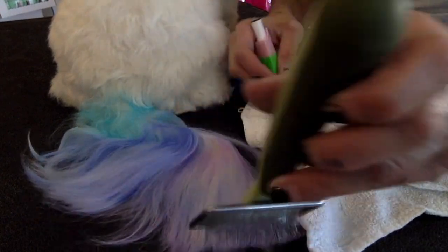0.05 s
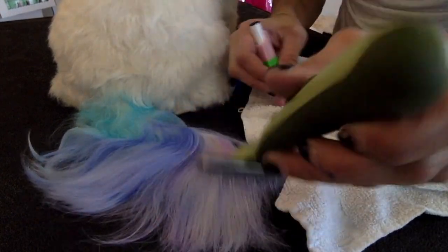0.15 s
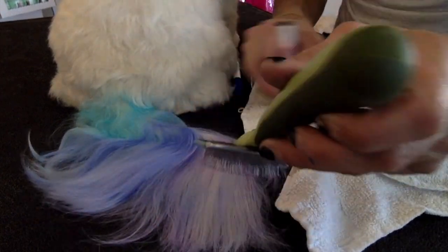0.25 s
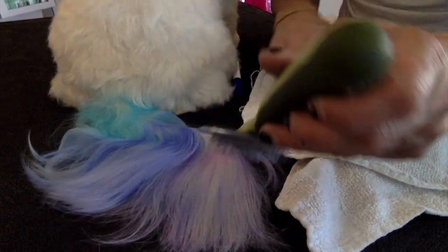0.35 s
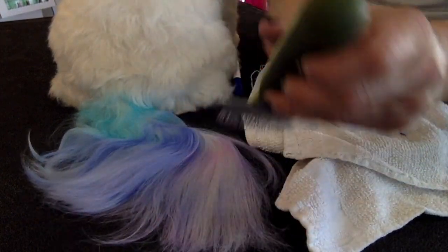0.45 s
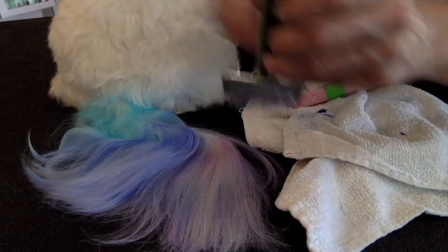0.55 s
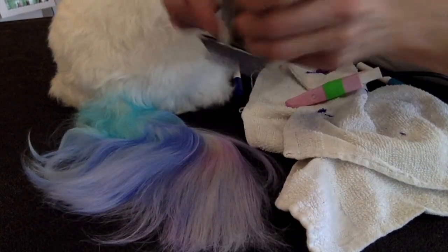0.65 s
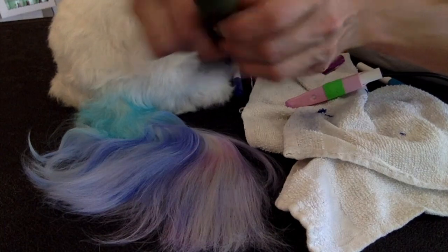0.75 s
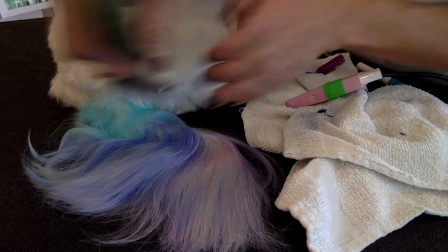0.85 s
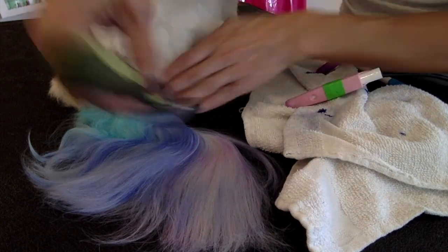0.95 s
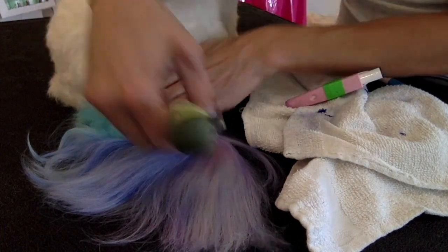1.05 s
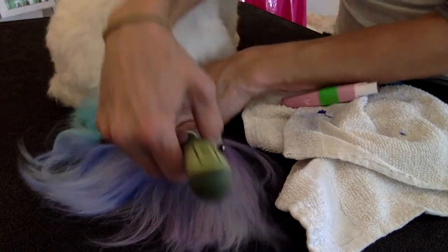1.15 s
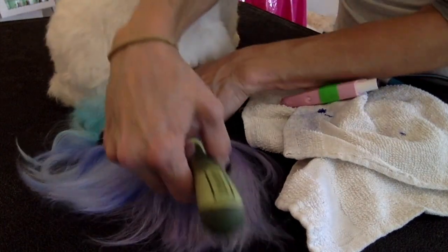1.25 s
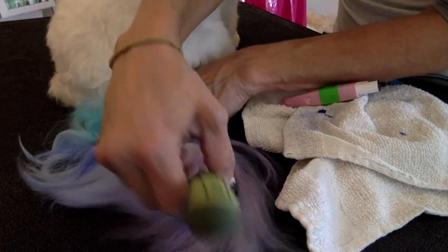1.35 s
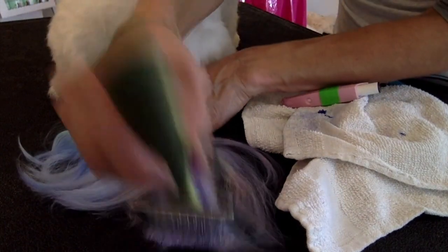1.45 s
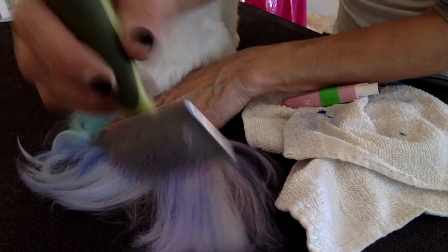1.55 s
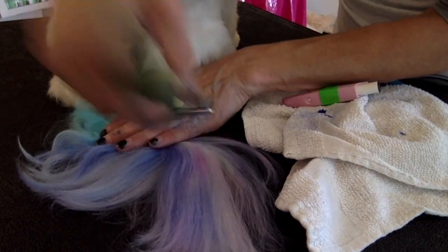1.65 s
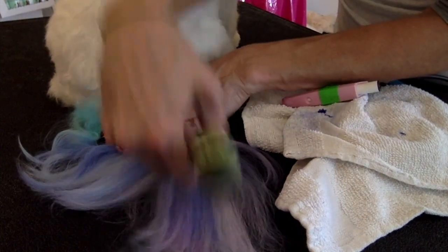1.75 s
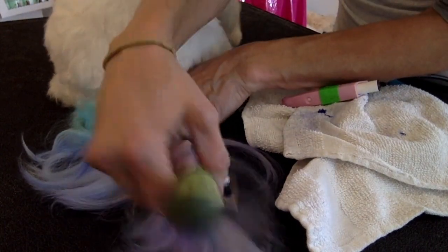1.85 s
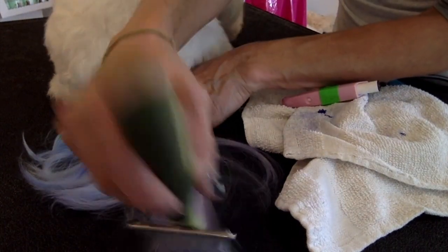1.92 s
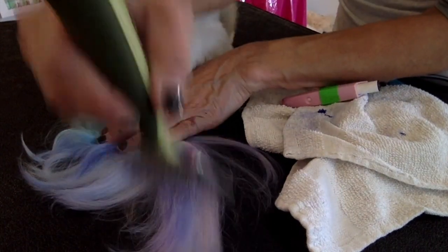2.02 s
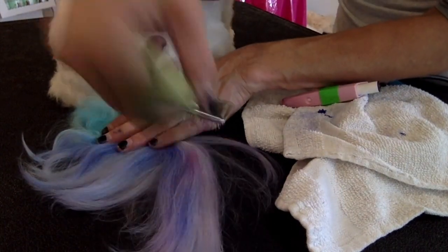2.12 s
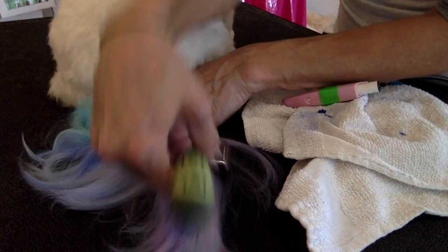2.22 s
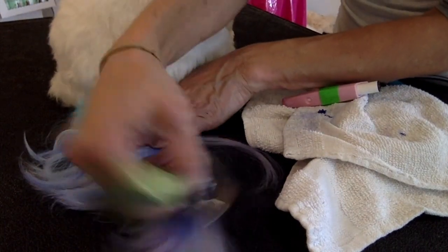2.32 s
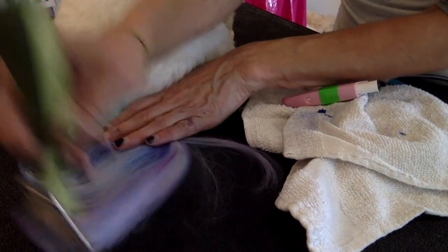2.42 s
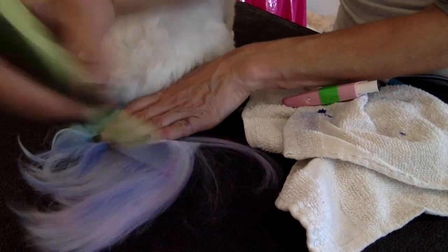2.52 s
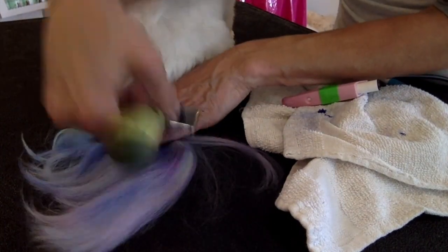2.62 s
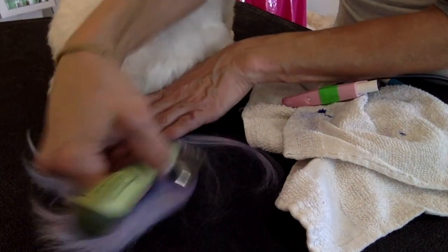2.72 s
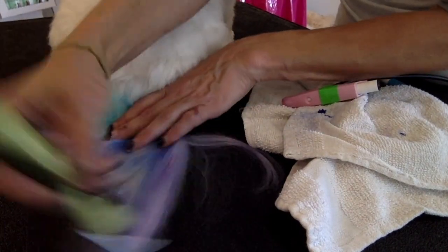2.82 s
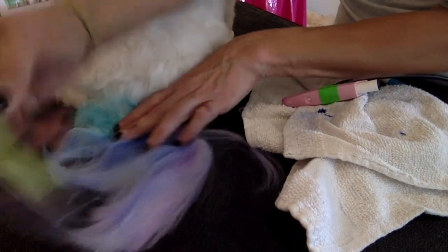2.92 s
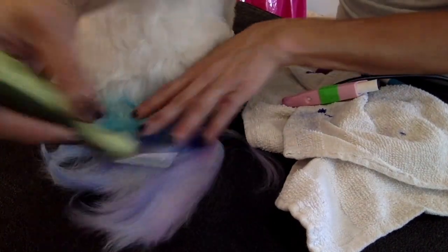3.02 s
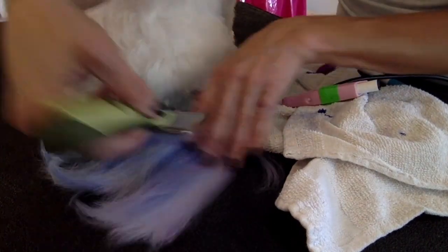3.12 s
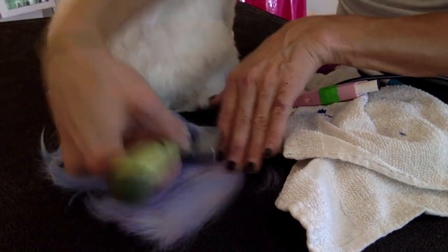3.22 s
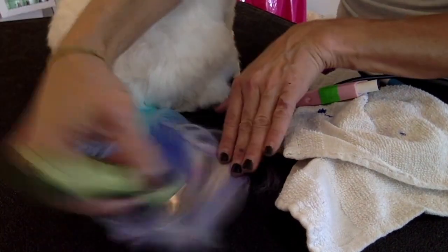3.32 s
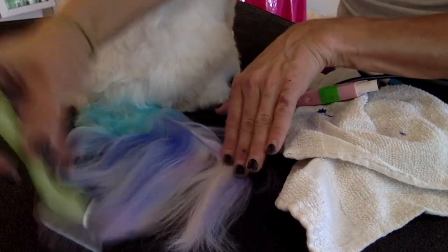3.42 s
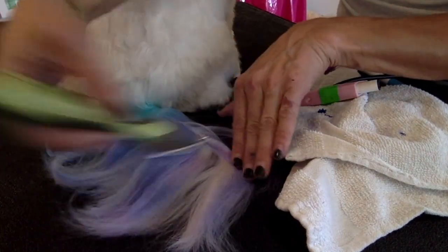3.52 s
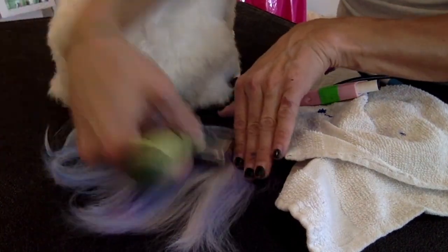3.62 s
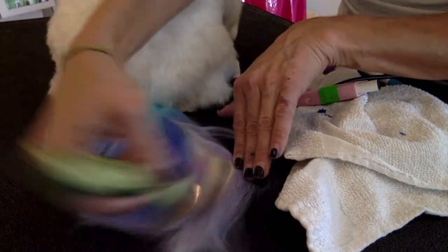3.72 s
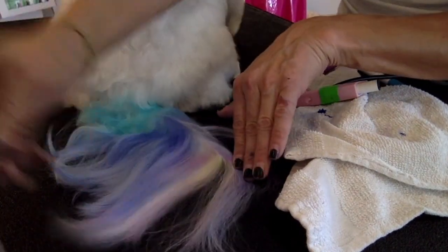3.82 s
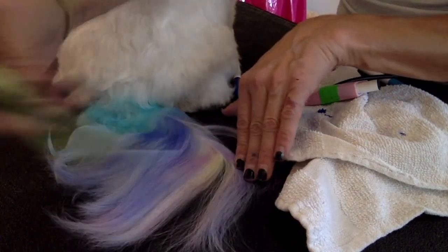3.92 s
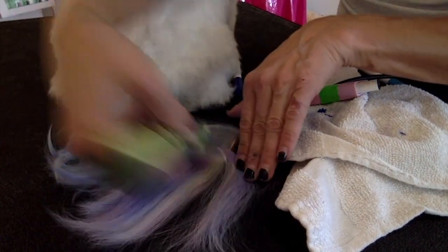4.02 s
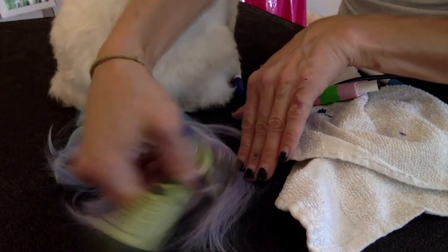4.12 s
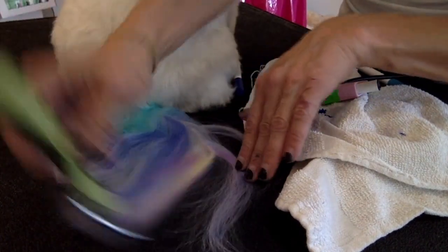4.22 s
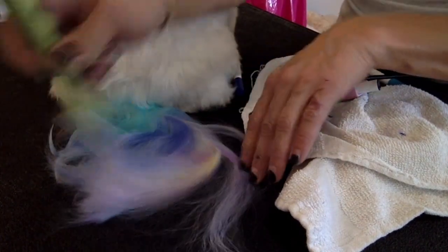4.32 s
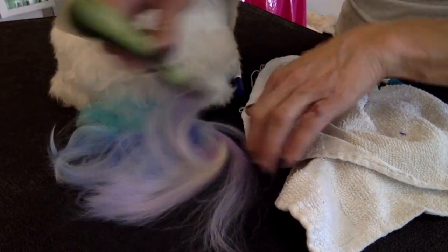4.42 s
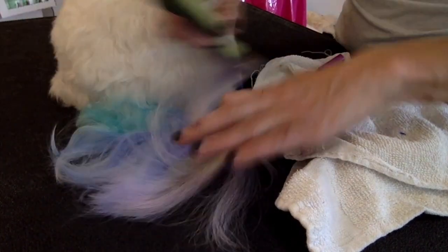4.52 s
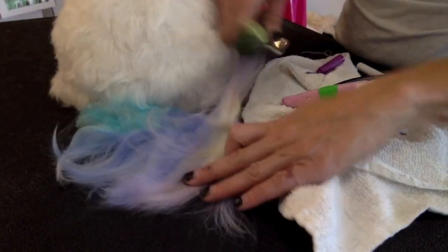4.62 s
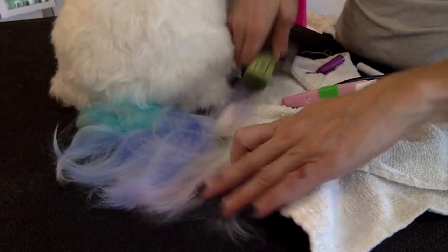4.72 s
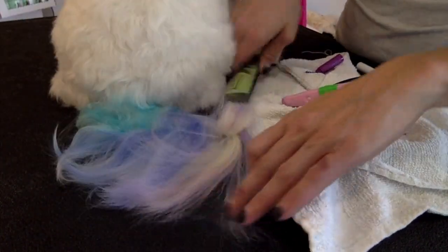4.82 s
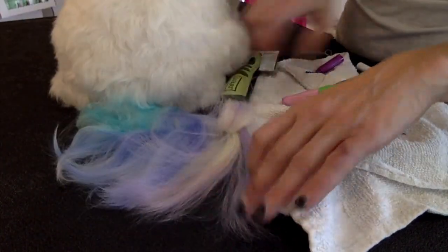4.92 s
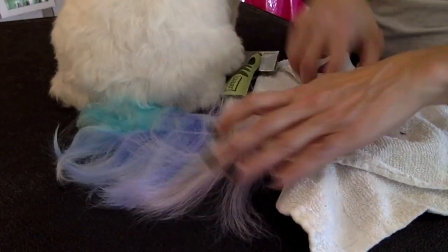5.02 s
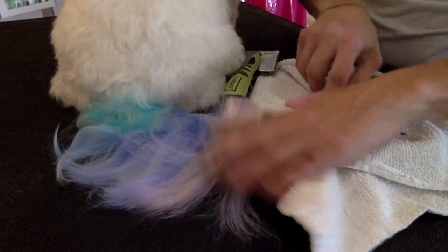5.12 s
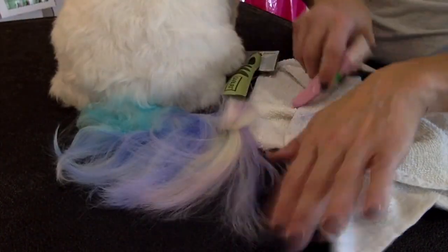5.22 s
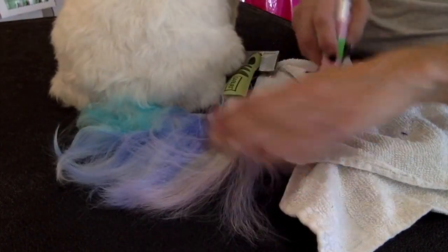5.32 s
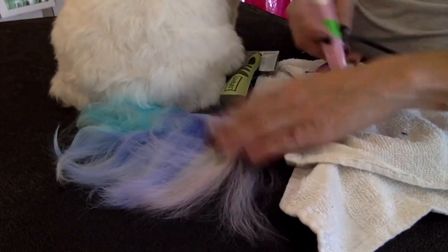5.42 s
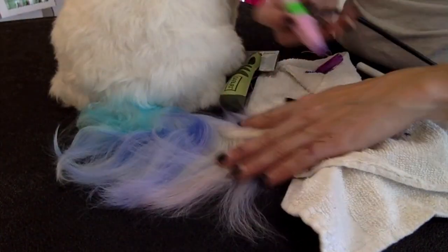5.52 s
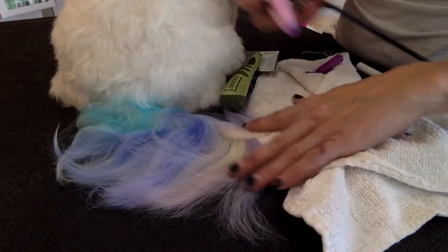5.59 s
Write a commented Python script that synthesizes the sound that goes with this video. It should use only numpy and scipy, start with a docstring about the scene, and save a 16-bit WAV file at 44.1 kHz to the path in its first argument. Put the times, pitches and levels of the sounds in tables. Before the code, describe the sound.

A low, airy equipment hum runs alone for just over a second in a small room. Then a wire-pinned brush makes seven short, bright hissing strokes through silky hair, close to the microphone, roughly half a second apart. Some begin with a tiny tick, and later ones sound firmer. Faint grainy cloth rustles follow as the hum goes on.

```python
"""A low hum of grooming equipment fills a small room, then a wire slicker brush is pulled close by.
It goes seven times through silky dog hair: filtered noise and tiny clicks swell into a hiss and fall away.
Some strokes start with a tick as the pins touch down; after the strokes, grainy noise rustles like a towel.
The hum is shaped noise plus unsteady tones, and faint wall echoes blur the close sounds.
A noise suppressor lets the hum up with each stroke and slowly sinks it in the pauses."""
import sys
import numpy as np
from scipy import signal
from scipy.fft import rfft, irfft, next_fast_len
from scipy.io import wavfile
from scipy.ndimage import uniform_filter1d, map_coordinates

SR = 44100
rng = np.random.default_rng(int(sys.argv[2]) if len(sys.argv) > 2 else 0)


def wrap_up_sound(samples):
    """Save the sound to the file named by the first command line argument, as 16-bit audio."""
    columns = np.atleast_2d(samples).T
    # keep every value between -1 and 1, then stretch to whole-number steps
    tamed = np.clip(columns, -1, 1)
    steps = np.round(tamed * 32767).astype(np.int16)
    wavfile.write(sys.argv[1], SR, steps)


N = 249341
TOP_HZ = 15750  # upper limit of the sound

# Brush strokes. Columns: bite_s, rise_s (bite to full pull), hold_s, level_db (at full pull),
# swell_db (rise from the bite), shape (1 even, 2 early), fall_db_per_s (after release), grip (0 to 1)
BRUSH_STROKES = [ (1.308, 0.12, .040, -25.5, 10, 1.2, 1499, .05),
                 (1.864, .076, .025, -22, 9.5, 2, 1046, .45), (2.326, 0.09, 0.019, -22, 8, 2, 1298.5, .6),
                 (2.779, 0.069, .028, -21.5, 11, 1, 2900.5, .7),
                 (3.338, 0.054, 0.029, -24, 3.5, 2, 1099, .9), (3.734, 0.081, .014, -21, 8, 1, 448, .95),
                 (4.175, 0.083, .010, -21, 16.5, 1.03, 1601.5, 0.9)]
EDGE_HZ, EDGE_GRIP_HZ = 1880, -950  # lower edge of the hiss with the pins sunk in, and its shift at full grip
HEAD_DB, HEAD_GRIP_DB = -31, 12  # brush head relative to the hiss at no grip, and its gain at full grip
RING_DB, RING_GRIP_DB = -19.5, 13  # the same for the ring of the pins
BRIGHT_DB = 4.5  # lift of the hiss's highest part against the rest
RECOVER_S = 0.091  # time the pins take to relax
BITE_DB, BITE_S = 4, 0.002  # extra jump in level as the pins catch, and its duration
ATTACK_DB_PER_S = 1900.5  # pins brushing in before the bite
EASE_DB_PER_S = 54  # the pull slackens while it is held


def brush(light_edge_hz=3500, last_edge_hz=1450, ring_hz=4420, head_delay_db=14, split_hz=6500,
          snag_db=0.4, sink_share=0.85, touch_ring_db=-8):
    """Hairs slip off the pins; a deeper, firmer grip lowers the hiss's edge and brings in head and ring."""
    t = clock()
    hiss, ring, head = np.zeros((3, N))
    edge = []
    for bite, rise, hold, db, swell_db, shape, fall, grip in BRUSH_STROKES:
        full = bite + rise
        release = full + hold
        slack = np.clip((full - t) / rise, 0, 1)  # 1 at the bite, 0 at full pull
        early = np.maximum(bite - t, 0)
        late = np.maximum(t - release, 0)
        bite_drop_db = BITE_DB * np.minimum(early / BITE_S, 1)
        entering_db = bite_drop_db + ATTACK_DB_PER_S * early + swell_db * slack ** shape
        leaving_db = EASE_DB_PER_S * np.clip(t - full, 0, hold) + fall * late
        pull = amp(db - entering_db - leaving_db)
        hiss += pull
        ring += pull * amp(RING_DB + RING_GRIP_DB * grip)
        head += pull * amp(HEAD_DB + HEAD_GRIP_DB * grip - head_delay_db * slack ** 2)
        deep_hz = EDGE_HZ + EDGE_GRIP_HZ * grip
        edge += [(bite, light_edge_hz), (bite + sink_share * rise, deep_hz)]
        edge += [(release, last_edge_hz), (release + RECOVER_S, light_edge_hz)]

    # single hairs snapping free stand out of a bed of smooth sliding
    hairs = flicks(rate=5500, scatter_db=1.5) + amp(-1) * rng.standard_normal(N)
    pins = unit(coloured(hairs, pin_colour))
    pins = unit(shifting(pins, np.interp(t, *np.transpose(edge))))

    # brighten the hiss above the split
    low_pass = signal.butter(3, min(split_hz, SR / 3), fs=SR, output="sos")
    low = signal.sosfiltfilt(low_pass, pins)
    pulled = amp(-BRIGHT_DB / 2) * low + amp(BRIGHT_DB / 2) * (pins - low)

    sing = ringing(ring_hz, width_hz=400)
    body = unit(coloured(flicks(rate=1500, scatter_db=4.5), head_colour))
    strokes = hiss * pulled + ring * sing + head * body
    touchdowns = touches() * (pins + amp(touch_ring_db) * sing)
    snags = amp(snag_db * wobble(170))  # tufts catch and let go
    return snags * (strokes + touchdowns)


# Colour of hair flicking off the wire pins, before scaling. Columns: pitch_hz, level_db (per Hz)
PIN_SPECTRUM = [(600, -38), (1100, -25), (2000, -15), (2500, -8), (3000, -5), (3550, -1), (4400, 0.5),
                (5200, -1.5), (6500, -10.5), (8400, -3.5), (9800, -7), (11300, -13.5), (13100, -6),
                (15800, -10)]
# Narrow peaks and dips in the hiss of the pins. Columns: pitch_hz, width_hz, change_db
PIN_PEAKS_AND_DIPS = [(3810, 140, 4), (4900, 170, 1.5), (8560, 160, -4), (9700, 150, -3), (13300, 520, 0)]


def pin_colour(hz):
    """The broad bending resonances of the pins, with a few narrow peaks and dips."""
    return along(PIN_SPECTRUM, hz) + bumps(hz, PIN_PEAKS_AND_DIPS)


# Colour of the brush head's body, before scaling. Columns: pitch_hz, level_db (per Hz)
HEAD_SPECTRUM = [(150, -63.5), (450, -22), (800, -20.5), (1000, -8.5), (1150, -2.5), (1350, -8.5),
                 (1800, -7.5), (3000, -38)]


def head_colour(hz):
    """The brush head's body favours the middle of the spectrum around 1 kHz."""
    return along(HEAD_SPECTRUM, hz)


def shifting(x, edge_hz, steepness=6, patchy_db=3.0):
    """Cut x below a moving edge; its colour drifts as other pins meet other hairs."""
    hz, t, z = signal.stft(x, SR, nperseg=512)
    edge = np.interp(t, clock(), edge_hz)
    high_pass = 1 / np.sqrt(1 + (edge / (hz[:, None] + 1)) ** (2 * steepness))
    drifting = z * high_pass * amp(patchy_db * patches(z.shape))
    return signal.istft(drifting, SR, nperseg=512)[1][:N]


# The brush touches down before a stroke. Columns: start_s, tick_db, graze_db
TOUCHDOWNS = [(1.828, -29, -45), (2.295, -33.5, -40.5), (3.710, -31, -50), (4.129, -32.5, -33)]
TICK_RISE_S, TICK_FALL_S = 0.0011, 0.0018
GRAZE_AFTER_S, GRAZE_RISE_S, GRAZE_FALL_S = 0.009, 0.0076, 0.0073


def touches():
    """Strength of each touchdown: a sharp tick as the pins land, then a slower graze along the hair."""
    strength = np.zeros(N)
    for s, tick_db, graze_db in TOUCHDOWNS:
        strength += amp(tick_db) * swell(s, TICK_RISE_S, TICK_FALL_S)
        strength += amp(graze_db) * swell(s + GRAZE_AFTER_S, GRAZE_RISE_S, GRAZE_FALL_S)
    return strength


# The brush head judders as it catches on a tangle. Columns: peak_s, level_db
TANGLE_CATCHES = [(4.195, -37), (4.212, -41.5), (4.246, -41.5), (4.266, -44)]


def judder(head_hz=1180):
    """Each catch rings the brush head briefly."""
    knocks = sum(amp(db) * swell(s, rise=0.0042, fall=0.0078) for s, db in TANGLE_CATCHES)
    return knocks * ringing(head_hz, width_hz=130)


# Hands and tools on the towel. Columns: peak_s, level_db, length_s, brightness_db_per_octave
TOWEL_RUSTLES = [(4.466, -58, .03, -15), (4.879, -62, 0.038, 1), (4.915, -52, 0.042, -0.5),
                 (5.236, -52, 0.04, 20), (5.258, -54, 0.034, -3.5)]
# Colour of the cloth before brightness and scaling. Columns: pitch_hz, level_db (per Hz)
CLOTH_SPECTRUM = [(2200, -19), (3200, -15), (4000, -7), (4900, -3), (6200, -20), (8300, -8), (10500, -26),
                  (13200, -11), (15500, -24)]
# The tools ring faintly as they slide. Columns: pitch_hz, width_hz, lift_db
TOOL_RESONANCES = [(3744, 300, 12.5), (8340, 550, 8), (13120, 700, 7)]
RUSTLE_RISE = 0.22  # rise time as a share of a rustle's length
# a thin, high swish as the brush is moved aside
WHISPER_S, WHISPER_DB, WHISPER_HALF_S, WHISPER_HZ = 4.85, -70, 0.075, 13350


def towel(crackle_db=3.0):
    """Sliding over cloth makes many tiny clicks, heard as soft, grainy rustles, with one thin swish."""
    fibres = flicks(rate=2400, scatter_db=0.5)
    whisper = swell(WHISPER_S, WHISPER_HALF_S, WHISPER_HALF_S) * ringing(WHISPER_HZ, width_hz=1200)
    out = amp(WHISPER_DB) * whisper
    for s, db, length, tilt_db in TOWEL_RUSTLES:
        def rustle_colour(hz):
            """The cloth's colour tilted by brightness, plus tool resonances, with the top cut."""
            first_hz = CLOTH_SPECTRUM[0][0]
            tilted = [(f, level + tilt_db * np.log2(f / first_hz)) for f, level in CLOTH_SPECTRUM]
            return along(tilted, hz) + bumps(hz, TOOL_RESONANCES) - 60 * (hz > TOP_HZ)

        rustle = unit(coloured(fibres, rustle_colour))
        out += amp(db) * swell(s, RUSTLE_RISE * length, length) * rustle
    return out * unit(amp(crackle_db * wobble(200)))  # loops of the cloth catch one after another


# How long the room rings once its hold is over. Columns: pitch_hz, time_s (to fall 60 dB)
ROOM_FADE = [(300, 0.36), (1500, 0.35), (4000, .30), (9000, 0.2), (15000, 0.12)]
# Colour the walls give to the wash. Columns: pitch_hz, gain_db
WALL_TONE = [(1000, -1), (2200, 2), (3000, 2), (4500, -1), (7000, 1.5), (13000, -6)]


def room(x, gap=0.0072, hold=0.052, patchy_db=1.5):
    """Countless wall echoes blur the sound into a diffuse wash that holds briefly and fades, treble first."""
    hz, t, z = signal.stft(x, SR, nperseg=256)
    age = t[t < 0.5]  # seconds since the sound left its source
    fade_s = along(ROOM_FADE, hz)[:, None]
    build_up = 1 - np.exp(-(age / gap) ** 2)
    linger = amp(-60 * np.maximum(age - hold, 0) / fade_s) ** 2 * build_up
    linger /= linger.sum(1).mean()

    # noise takes on the smeared power of the sound
    blurred = uniform_filter1d(abs(z) ** 2, size=9, axis=0)
    power = signal.fftconvolve(blurred, linger, axes=1)[:, :len(t)]
    noise = signal.stft(rng.standard_normal(N), SR, nperseg=256)[2]
    noise = noise * amp(patchy_db * patches(z.shape))
    wash = noise * np.sqrt(abs(power) / np.mean(abs(noise) ** 2))
    wash = wash * amp(along(WALL_TONE, hz))[:, None]
    return signal.istft(wash, SR, nperseg=256)[1][:N]


# Colour of the rushing air, before scaling. Columns: pitch_hz, level_db (per Hz)
AIR_SPECTRUM = [(30, -48), (80, -24), (120, -7), (280, -5), (420, -11), (620, -9.5), (1000, -12),
                (1900, -16.5), (2500, -21), (3100, -27), (4900, -26), (5900, -35), (9300, -38.5),
                (14000, -44.5), (15500, -53.5)]
# Motor and fan tones. Columns: pitch_hz, level_db (relative to the drone, before flutter)
MOTOR_TONES = [(59, -25.5), (117, -15), (133, -14), (172.5, -7.5), (234, -16), (263, -12), (404, -6.5),
               (521, -15), (633, -17.5), (1384, -16.5), (1846, -18.5)]
DRONE_DB = -54  # reference level of the equipment


def equipment(air_db=-2.5, hum_db=0, drift=0.4, flutter_db=1.53):
    """Rushing air is shaped noise; motor tones are sines slightly unsteady in level and phase."""
    t = clock()
    air = unit(coloured(rng.standard_normal(N), lambda hz: along(AIR_SPECTRUM, hz)))
    hum = np.zeros(N)
    for hz, db in MOTOR_TONES:
        level = np.sqrt(2) * amp(db + flutter_db * wobble(7.6))
        hum += level * np.sin(2 * np.pi * hz * t + drift * wobble(7.6))
    return amp(DRONE_DB) * (amp(air_db) * air + amp(hum_db) * hum)


# fully open above OPEN_DB in the band it listens to, at most DEPTH_DB down, closing slowly
LISTEN_HZ, OPEN_DB, DEPTH_DB, CLOSE_DB_PER_S = (2950, 9000), -53, 7.5, 11
START_DB = -1  # its gain at the outset, before smoothing


def suppressor(x, slope=1.0, window_s=0.03, opening_s=0.045):
    """Turns quiet passages down: treble opens it quickly, then it slowly closes again."""
    band = np.clip(LISTEN_HZ, 100, SR / 3)
    treble = signal.sosfilt(signal.butter(3, band, "bandpass", fs=SR, output="sos"), x[0])
    power = uniform_filter1d(treble ** 2, int(window_s * SR) + 1)
    level_db = 10 * np.log10(abs(power) + 1e-12)
    wanted_db = np.clip(slope * (level_db - OPEN_DB), -DEPTH_DB, 0)
    wanted_db[0] = START_DB
    # the gain may jump up but falls no faster than the closing rate
    closing_db = CLOSE_DB_PER_S * clock()
    gain_db = np.maximum.accumulate(wanted_db + closing_db) - closing_db
    half = int(opening_s * SR / 2)
    return x * amp(uniform_filter1d(gain_db, 2 * half + 1, origin=half))  # the gain lags behind the sound


def ringing(hz, width_hz):
    """A resonance kept alive by friction: narrow noise about a pitch, rms 1."""
    smooth = signal.butter(2, width_hz / 2, fs=SR, output="sos")
    sway = signal.sosfilt(smooth, rng.standard_normal(N) + 1j * rng.standard_normal(N))
    turns = np.cumsum(hz * np.ones(N)) / SR
    return unit(np.real(sway * np.exp(2j * np.pi * turns)))


def flicks(rate, scatter_db):
    """Tiny random impulses of uneven size, rate a second on average, rms 1."""
    happens = rng.random(N) < rate / SR
    sign = np.sign(rng.standard_normal(N))
    size = amp(scatter_db * np.clip(rng.standard_normal(N), -2, 2))
    return unit(happens * sign * size)


def swell(s, rise, fall):
    """A brief bump at time s, 20 dB down one rise before and one fall after."""
    t = clock() - s
    distance = np.where(t < 0, -t / rise, t / fall)
    return amp(-20 * np.minimum(distance ** 2, 10))


def coloured(x, gain_db):
    """x through a causal filter with the given dB against frequency."""
    m = next_fast_len(N + 8192, real=True)
    gain = np.maximum(amp(gain_db(np.fft.rfftfreq(m, 1 / SR))), 1e-6)
    # folding the cepstrum gives the filter minimum phase
    cep = irfft(np.log(gain), m)
    cep[1:m // 2] *= 2
    cep[m // 2 + 1:] = 0
    return irfft(rfft(x, m) * np.exp(rfft(cep)), m)[:N]


def bumps(hz, modes):
    """dB that a few narrow peaks (positive) or dips (negative) add to a spectrum."""
    return sum(db / (1 + (2 * (hz - fc) / width) ** 2) for fc, width, db in modes)


def along(points, hz):
    """(Hz, value) points read on a log frequency axis."""
    f, v = np.transpose(points)
    return np.interp(np.log(hz + 1), np.log(f + 1), v)


def wobble(rate):
    """A smooth random curve, rate knots a second."""
    return map_coordinates(rng.standard_normal(int(N * rate / SR) + 4), [clock() * rate])


def patches(shape):
    """A random field of rms 1, smooth over a few bands and frames."""
    over_bands = uniform_filter1d(rng.standard_normal(shape), size=3, axis=0)
    return unit(uniform_filter1d(over_bands, size=5, axis=1))


def amp(db):
    """Decibels to gain."""
    return 10 ** (np.asarray(db) / 20)


def unit(x):
    """Scale to rms 1."""
    return x / np.sqrt(np.mean(x ** 2) + 1e-20)


def clock():
    """The time of every sample in seconds."""
    return np.arange(N) / SR


def scene():
    """Close brushing and handling, the room's answer and the drone."""
    close = brush() + judder() + towel()
    return (close + amp(-17.0) * room(close) + equipment())[None]


def record(dry):
    """Turn quiet passages down, then cut steeply above the upper limit."""
    band_limit = signal.ellip(14, 0.1, 80, TOP_HZ, fs=SR, output="sos")
    return signal.sosfilt(band_limit, suppressor(dry))


dry = scene()
out = record(dry)
wrap_up_sound(out)
```